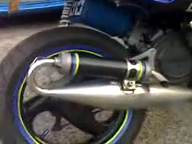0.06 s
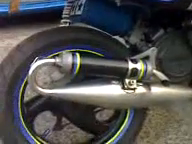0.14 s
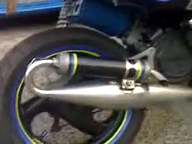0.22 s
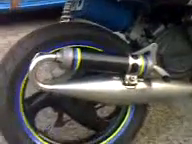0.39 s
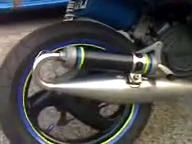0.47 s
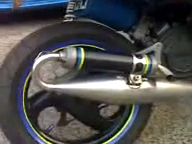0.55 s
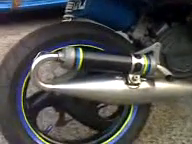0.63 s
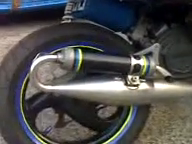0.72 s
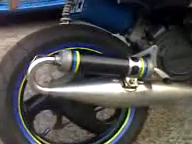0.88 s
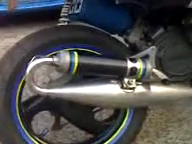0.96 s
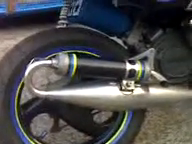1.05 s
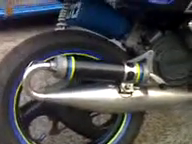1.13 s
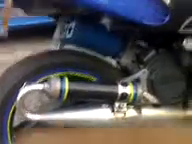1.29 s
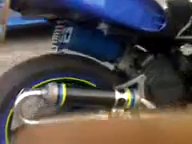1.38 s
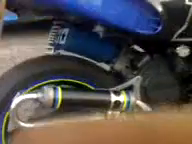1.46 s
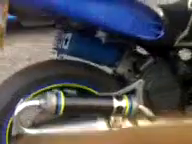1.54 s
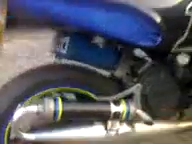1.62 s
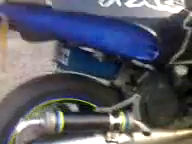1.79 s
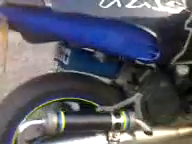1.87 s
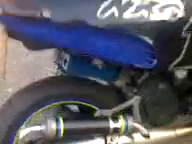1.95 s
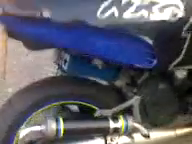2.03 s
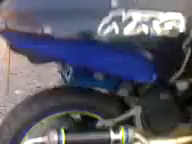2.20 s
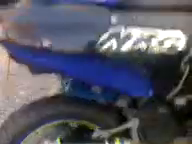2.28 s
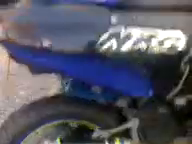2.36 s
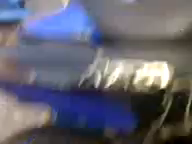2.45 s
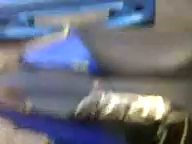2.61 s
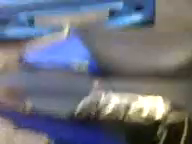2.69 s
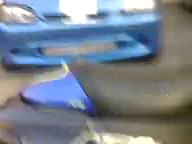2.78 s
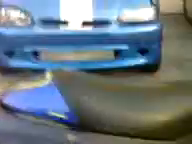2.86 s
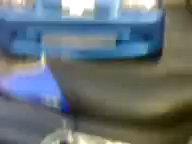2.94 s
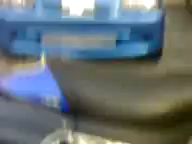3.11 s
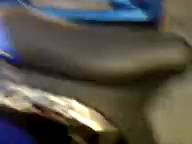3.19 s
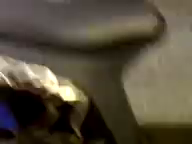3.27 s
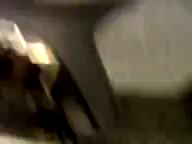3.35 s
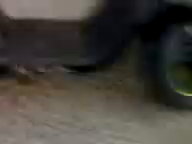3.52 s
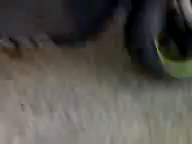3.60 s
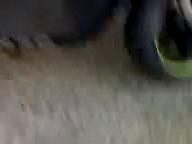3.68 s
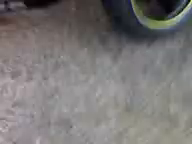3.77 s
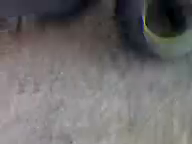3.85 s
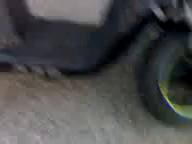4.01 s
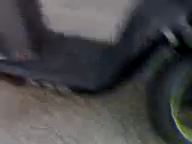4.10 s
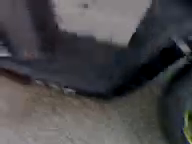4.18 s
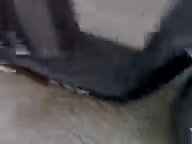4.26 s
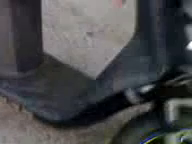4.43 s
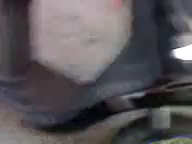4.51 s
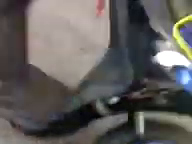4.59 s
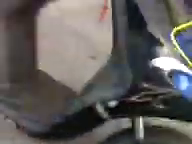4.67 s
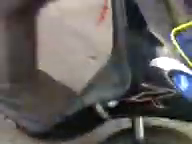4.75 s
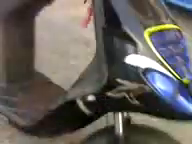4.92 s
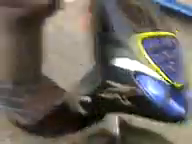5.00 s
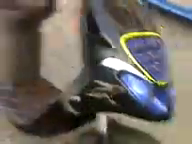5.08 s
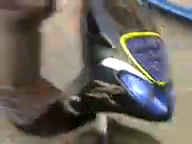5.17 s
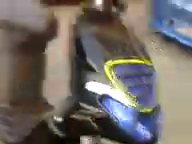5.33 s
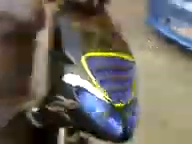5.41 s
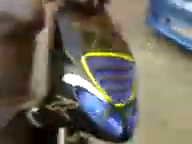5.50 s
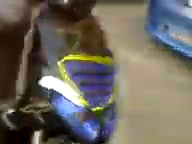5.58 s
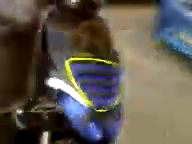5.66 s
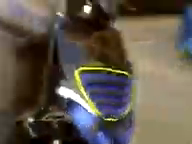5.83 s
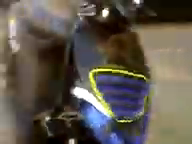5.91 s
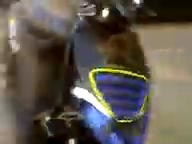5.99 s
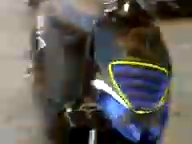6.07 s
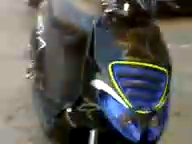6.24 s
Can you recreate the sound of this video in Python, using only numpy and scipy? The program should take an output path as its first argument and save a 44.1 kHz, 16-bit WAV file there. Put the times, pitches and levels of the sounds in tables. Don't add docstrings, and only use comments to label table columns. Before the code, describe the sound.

Close, rough two-stroke idle: irregular hollow pops, fast metallic ticking and rattling covers, growing duller and then quieter as the phone moves forward.

```python
import sys
import numpy as np
from scipy import signal
from scipy.fft import rfft, irfft, next_fast_len
from scipy.io import wavfile
from scipy.ndimage import uniform_filter1d, map_coordinates

SR = 44100
rng = np.random.default_rng(int(sys.argv[2]) if len(sys.argv) > 2 else 0)


def to_linear_factor(level_db):
    exponent = np.asarray(level_db, float) / 20
    return 10 ** exponent


def dump(signal):
    limited = np.clip(np.atleast_2d(signal).T, -1, 1)
    pcm = np.round(limited * 32767).astype(np.int16)
    wavfile.write(sys.argv[1], SR, pcm)


N = 275625
TURN = .0317

# (time [s], favoured pitch [Hz], its width [Hz], treble [dB], firing level [dB])
PLACE = [(0, 773, 118.6, -6.5, -12.5), (1.3, 804, 120.6, -8, -9.5), (2.1, 757, 121, -10, -9),
         (2.5, 803, 122, -13, -8), (2.75, 910, 249, -2, -16), (3, 610, 121, -6, -15),
         (3.3, 600, 181, -15.5, -13), (3.6, 770, 280, -19.5, -6.5), (4, 783, 283, -18.5, -9),
         (4.4, 863, 299, -10, -10.5), (4.8, 937, 200, -26, -12.5), (5.1, 1040, 200, -19, -13.5),
         (5.6, 1050, 228, -10.5, -16.5), (6.25, 980, 220, -4.5, -22.5)]
# (time [s], loss with distance [dB], cover over case [dB])
WALK = [(0, -0.2, 0.2), (1.1, -1.5, 0), (1.35, 0, 1.5), (1.9, -2, 3.5), (2.4, -3.5, 2), (2.8, -4.5, -2),
        (3.1, -2, 2.5), (3.45, -4.5, 7.5), (3.65, -5.5, 8.5), (4, -3.5, 6.5), (4.4, -5.5, 4),
        (5.2, -6.5, 2.5), (5.6, -7.5, 0), (5.85, -9.5, -2), (6.25, -12.5, -4.5)]
# (time [s], usual ping [dB], pitch [Hz])
SHIELD_VIEW = [(0, -12, 1636), (1.3, -11, 1644), (1.5, -20.5, 1653), (1.9, -10, 1660), (2.5, -16, 1605),
               (2.88, -15.5, 1654), (3, -24, 1744), (3.07, -12, 1592), (3.4, -13.5, 1625),
               (3.9, -16.5, 1690), (4.02, -31.5, 1760), (4.11, -14, 1738), (4.25, -27.5, 1605),
               (4.45, -21.5, 1618), (4.8, -22, 1581), (5.83, -32.5, 1602), (5.9, -21.5, 1650),
               (6.25, -16, 1661)]
# (time [s], level [dB])
OUTLET_BASS = [(0, 3.2), (1.4, 0.5), (2.1, -4), (3.6, -8), (4.2, -7), (6.25, -4.5)]


def unit(x):
    return x / np.sqrt(np.mean(x ** 2) + 1e-20)


def along(points, hz):
    f, v = np.transpose(points)
    return np.interp(np.log(hz + 1), np.log(f + 1), v)


def curves(rows, s):
    t, *cols = np.transpose(rows)
    return [np.interp(s, t, c) for c in cols]


def filtered(x, response):
    m = next_fast_len(N + SR // 2)
    return irfft(rfft(x, m) * response(np.fft.rfftfreq(m, 1 / SR)), m)[..., :N]


def resonances(modes):
    def response(f):
        total = 0
        for k, (centre, width, db) in enumerate(modes):
            total = total + (-1) ** k * to_linear_factor(db) * 1j * f * width / (centre ** 2 - f * f + 1j * f * width)
        return total
    return response


def spectrum(points):
    return lambda f: to_linear_factor(along(points, f))


def lowpass(hz):
    return lambda f: 1 / (1 + (f / hz) ** 2)


def placed(starts, shapes):
    at = np.round(starts * SR).astype(int)[:, None] + np.arange(shapes.shape[1])
    return np.bincount(np.clip(at, 0, N).ravel(), shapes.ravel(), N + 1)[:N]


def firings():
    # (time [s], crank turns between firings from here on [turns])
    rhythm = [(.064, 3), (.156, 2), (.554, 3), (.938, 2), (1.003, 3), (1.283, 2), (1.349, 3), (1.922, 2),
              (2.053, 3), (2.15, 3), (2.239, 2), (2.303, 3), (2.682, 2), (2.814, 3), (3.196, 2), (3.393, 3),
              (3.592, 3), (3.964, 2), (4.027, 3), (4.122, 2), (4.19, 3), (4.383, 3), (4.569, 4), (4.693, 3),
              (4.974, 2), (5.04, 3), (5.808, 2), (5.876, 3), (6.163, 3)]
    # (time [s], loss [dB])
    weak = [(.156, 1.5), (.22, 1), (1.283, 4.5), (2.239, 6.5), (2.398, 1), (2.682, 2), (3.493, 2),
            (4.122, 2.5), (4.974, 3.5), (5.808, 2), (5.876, 1.5)]
    s, wait = np.transpose(rhythm)
    spans = np.round(np.diff(s) / TURN / wait[:-1]) * wait[:-1]
    marks = np.r_[3, 3 + np.cumsum(spans)]
    runs = [np.arange(a, b, w) for a, b, w in zip(marks, marks[1:], wait)]
    turn = np.concatenate(runs + [marks[-1:]])
    when = np.interp(turn, marks, s)
    db = curves(PLACE, when)[3] + 0.23 * rng.standard_normal(len(when))
    poor, loss_db = np.transpose(weak)
    db[np.abs(when[:, None] - poor).argmin(axis=0)] -= loss_db
    return when, turn, db


def crank(when, turn):
    times = np.r_[when[0] - 3 * TURN, when, when[-1] + 4 * TURN]
    return np.interp(np.arange(N) / SR, times, np.r_[0, turn, turn[-1] + 4])


def turn_starts(angle):
    return np.flatnonzero(np.diff(np.floor(angle)))


def stroke_sizes(angle):
    return to_linear_factor(1.5 * rng.standard_normal(500))[(2 * angle).astype(int)]


def strokes(angle, floor):
    phase = 2 * angle % 1
    knock = np.exp(-4 * phase) * 1.6 * (1 - np.exp(-9 * phase))
    return stroke_sizes(angle) * (floor + knock)


def shaken(gate, response):
    return unit(filtered(gate * rng.standard_normal(N), response))


def engine_case(angle, loss_db, lean_db):
    # (pitch [Hz], width [Hz], level [dB])
    case_modes = [(215, 28, -4), (281, 32, 0), (320, 36, -3)]
    shaking = unit(strokes(angle, 0.94) * rng.standard_normal(N))
    blows = unit(stroke_sizes(angle) * np.diff(np.floor(angle), prepend=0))
    ringing = filtered(shaking + 0.67 * blows, lambda f: resonances(case_modes)(f) ** 2)
    return to_linear_factor(-31 + 0.64 * loss_db - lean_db) * unit(ringing)


def covers(angle, loss_db, lean_db):
    # (pitch [Hz], width [Hz], level [dB])
    cover_modes = [(405, 25, -7), (520, 24, 0), (580, 50, -9)]
    return to_linear_factor(-34.5 + .45 * loss_db + lean_db) * shaken(strokes(angle, 0.37), resonances(cover_modes))


def whirr(angle, loss_db):
    # (pitch [Hz], level [dB per Hz])
    whirr_colour = [(360, -38.5), (620, 5), (869, -10.5), (950, 0.5), (1230, -7), (1380, -1), (1610, -1),
                    (1850, -7.5), (2000, -25), (2600, -42.5), (4400, -120)]
    return to_linear_factor(-29.5 + loss_db) * shaken(strokes(angle, 0.77), spectrum(whirr_colour))


def fine_rattle(angle, loss_db):
    # (pitch [Hz], level [dB per Hz])
    hiss_colour = [(1120, -27.5), (1900, -1.5), (2170, 2), (2680, -11), (3070, -8), (3990, -28.5),
                   (4240, -37.5), (5510, -67.5), (9330, -120)]
    # (pitch [Hz], width [Hz], level [dB])
    fin_modes = [(3086, 160, -4), (2550, 120, -4.5)]
    flutter_db = 2.5 * map_coordinates(rng.standard_normal(300), [angle], order=1)
    hiss = to_linear_factor(flutter_db - 37.5 + 1.57 * loss_db) * shaken(strokes(angle, 1.0), spectrum(hiss_colour))
    fins = to_linear_factor(flutter_db - 49.5 + .5 * loss_db) * shaken(strokes(angle, 0.58), resonances(fin_modes))
    return hiss + fins


def rumble(angle, now):
    # (pitch [Hz], level [dB per Hz])
    rumble_colour = [(18, -55.5), (30, -12), (97, -14), (150, -7), (180, -1.5), (230, -15.5), (400, -120)]
    level_db = -40 + .8 * curves(OUTLET_BASS, now)[0]
    return to_linear_factor(level_db) * shaken(strokes(angle, 0.23), spectrum(rumble_colour))


def hollow(angle, now):
    # (time [s], resonance [Hz], level [dB])
    hollow_path = [(0, 330, -41), (2.2, 335, -36.5), (2.5, 340, -31.5), (3, 345, -29), (3.3, 350, -33),
                   (3.55, 385, -31), (3.8, 460, -37), (4.3, 430, -40), (6.25, 400, -41)]
    hz, db = curves(hollow_path, now)
    breadth = shaken(strokes(angle, 1.0), lowpass(60))
    return to_linear_factor(db + 4.5) * breadth * np.sin(2 * np.pi * np.cumsum(hz) / SR)


def chatter(angle, now):
    ping_db, hz = curves(SHIELD_VIEW, now)
    tremor = shaken(strokes(angle, 0.083), lowpass(50))
    return to_linear_factor(ping_db - 15) * tremor * np.sin(2 * np.pi * np.cumsum(hz) / SR)


def moving_parts(angle):
    now = np.arange(N) / SR
    loss_db, lean_db = curves(WALK, now)
    body = engine_case(angle, loss_db, lean_db) + covers(angle, loss_db, lean_db)
    light = whirr(angle, loss_db) + fine_rattle(angle, loss_db)
    return body + light + rumble(angle, now) + hollow(angle, now) + chatter(angle, now)


def pipe(starts, peak_db, tilt_db, scatter_db, blur):
    # (pitch [Hz], level [dB], time to die by 60 dB before damping
    # [s])
    pipe_modes = [(209, -4, .07), (300, -5, .07), (400, -7, .07), (520, -3, .07), (650, -2, .06),
                  (725, -2, .065), (785, -5, .06), (840, 0, .07), (940, 0, .07), (1030, -2, .065),
                  (1135, -2, .065), (1250, -9, .05), (1345, -1, .06), (1480, -5, .05), (1700, -4, .05),
                  (1870, -8, .05), (2065, -8, .05), (2180, 1, .065), (2300, -8, .045), (2520, -12, .04),
                  (2800, -14, .04), (3100, -15, .04)]
    # (time [s], lag of upper waves [s per kHz], share heard straight from the mouth [ratio])
    sound_paths = [(0, .016, .7), (3, .016, .6), (3.5, .016, .7), (4.1, .014, .8), (4.5, .014, 1),
                   (4.9, .016, .9), (5.05, .018, .6), (6.25, .018, .6)]
    damping = 1.45
    shielded_hz = 1800
    muffled_hz = 2830
    hz, db, t60 = np.transpose(pipe_modes)
    centre, width, treble_db = (c[:, None] for c in curves(PLACE, starts)[:3])
    lag, prompt = (c[:, None] for c in curves(sound_paths, starts))

    floor = to_linear_factor(np.where(hz > centre, treble_db, -9))
    favour = np.maximum(1 / (1 + ((hz - centre) / width) ** 4), floor)
    scatter = scatter_db * rng.standard_normal(favour.shape)
    gain = favour * to_linear_factor(db + tilt_db * np.log2(hz / 800) + scatter)
    phase = blur * rng.standard_normal(favour.shape)[..., None]

    late = lag * np.clip(hz / 1000 - .62, 0, .65)
    late = np.round(late * hz) / hz
    f = np.arange(480) * SR / 4096
    push = hz[:, None] * np.cos(phase) + 1j * f * np.sin(phase)
    ring = push / (hz[:, None] ** 2 - f * f + 2.2j * damping * f / t60[:, None])
    straight = (prompt / (1 + (hz / shielded_hz) ** 2))[..., None]
    paths = straight + np.exp(-2j * np.pi * f * late[..., None])

    mouth = 1j * f * 700 / (centre ** 2 - f * f + 1j * f * 700)
    mouth = mouth * 1j * f / (70 + 1j * f)
    packing = 1 - (f / muffled_hz) ** 2 + 1.3j * f / muffled_hz
    rung = (gain[..., None] * ring * paths).sum(axis=1)
    blows = irfft(rung / (1 + 1j * f / 1500) / packing * mouth, 4096)
    strength = blows[:, :SR // 60].std(axis=1, keepdims=True) * 2.5
    return placed(starts, to_linear_factor(peak_db)[:, None] * blows / strength)


def puffs(angle, shake_db):
    turns = turn_starts(angle) / SR
    luck_db = 2.8 * rng.standard_normal(len(turns))
    puff_db = curves(WALK, turns)[0] - 21 + 0.45 * shake_db + luck_db
    return pipe(turns, puff_db, tilt_db=-9.0, scatter_db=4.5, blur=0.95)


def rasp(s, db):
    # (pitch [Hz], level [dB per Hz])
    rasp_colour = [(300, -32.5), (600, 2.5), (1300, 4), (2200, 1), (3200, -18.5), (4300, -40.5),
                   (6000, -120)]
    t = np.arange(SR // 20) / SR
    burst = t / 0.0024 * np.exp(1 - t / 0.0052)
    jet = placed(s, to_linear_factor(db + 0.82 * curves(PLACE, s)[2])[:, None] * burst)
    return to_linear_factor(-8.5) * jet * shaken(1, spectrum(rasp_colour))


def thump(s):
    t = np.arange(SR // 10) / SR
    luck = rng.standard_normal((len(s), 2))
    db = -20.5 + curves(OUTLET_BASS, s)[0] + 2.5 * luck[:, 0]
    hz = 190 * (1 + .12 * luck[:, 1:])
    fade = to_linear_factor(db[:, None] - 60 * t / .055)
    return placed(s, fade * (1 - np.exp(-t / 0.0053)) * np.sin(2 * np.pi * hz * t))


def exhaust(angle, s, db, shake_db):
    cracks = pipe(s - .0003, db + .5, tilt_db=0, scatter_db=2.5, blur=.3)
    return cracks + rasp(s, db) + thump(s) + puffs(angle, shake_db)


def contacts(angle, fired):
    after_firing_db = [
        1.5,
        -4,
        -2,
        -4,
    ]
    # (time [s], peak [dB])
    clang = [(0.0628, -8.5), (.162, -5.5), (0.195, -1.5), (0.2601, -3.5), (0.2908, -8), (0.4234, -6),
             (0.5624, -6.5), (0.6278, -13), (0.6619, -6), (0.7836, -11), (0.8804, -3), (0.915, -2.5),
             (1.012, -8), (1.3456, -8), (1.513, -9), (1.7412, -5), (2.0602, -7), (2.2493, -5.5),
             (2.4693, -4.5), (2.823, -11.5), (3.27, -7), (3.3327, -9.5), (3.6012, -11), (3.6915, -9.5),
             (3.8743, -9), (4.567, -16), (4.6696, -13.5), (5.211, -11.5), (6.0792, -13), (6.1734, -14.5)]
    at = turn_starts(angle)
    turn = np.round(angle[at])
    last_fired = fired[np.maximum(np.searchsorted(fired, turn, "right") - 1, 0)]
    since = (turn - last_fired).astype(int) % len(after_firing_db)
    luck = rng.standard_normal((len(at), 2))
    s = at / SR + .0065 + 0.00072 * luck[:, 0]
    db = curves(SHIELD_VIEW, s)[0] + np.array(after_firing_db)[since] + 3 * luck[:, 1]
    hard, hard_db = np.transpose(clang)
    nearest = np.abs(s[:, None] - hard).argmin(axis=0)
    s[nearest], db[nearest] = hard, hard_db
    return s, db


def shield(s, db):
    t = np.arange(SR // 16) / SR
    luck = rng.standard_normal((len(s), 3))
    hz = curves(SHIELD_VIEW, s)[1] * (1 + .01 * luck[:, 0])
    split = 46 * (1 + .1 * luck[:, 1])
    envelope = to_linear_factor(-60 * t / .035) * (1 - np.exp(-(t / .004) ** 2))
    beat = np.sin(2 * np.pi * split[:, None] * t) * envelope
    ring = beat * np.sin(2 * np.pi * hz[:, None] * t + 3 * luck[:, 2:])
    rough = unit(uniform_filter1d(rng.standard_normal(beat.shape), size=70))
    upper = np.sin(3.9 * np.pi * hz[:, None] * t + 2 * luck[:, 1:2])
    ring += to_linear_factor(-26) * beat * rough * upper
    return placed(s - .0025, to_linear_factor(db + 8.5)[:, None] * ring)


def yard(x):
    # (pitch [Hz], time to die by 60 dB [s])
    echo_times = [(200, 0.96), (1000, 0.25), (4000, 0.013)]
    hz, t, z = signal.stft(rng.standard_normal(SR // 3), SR, nperseg=256)
    fade = to_linear_factor(-60 * t / along(echo_times, hz)[:, None])
    tail = signal.istft(z * fade, SR, nperseg=256)[1]
    return signal.fftconvolve(np.pad(x, (300, 0)), tail / np.linalg.norm(tail))[:N]


def scene():
    when, turn, db = firings()
    angle = crank(when, turn)
    knocks, knock_db = contacts(angle, turn)
    shake_db = knock_db - curves(SHIELD_VIEW, knocks)[0]
    hits = exhaust(angle, when, db, shake_db) + shield(knocks, knock_db)
    return (hits + to_linear_factor(-21.0) * yard(hits) + moving_parts(angle))[None]


def overload_ticks():
    # (time [s], peak [dB])
    overload = [
        (0.0732, -31),
        (0.6624, -50),
        (0.7567, -27),
        (1.0989, -42),
        (1.1952, -31),
        (2.0612, -31),
    ]
    s, db = np.transpose(overload)
    ticks = placed(s, to_linear_factor(db + 11)[:, None] * signal.windows.gaussian(15, 1.35)[None])
    return filtered(ticks, lambda f: 1 / (1 + (3900 / (f + 1)) ** 10))


def phone_band(f):
    bass = ((1j * f / 40) / (1 + 1j * f / 40)) ** 2
    return bass / (1 + (f / 4050) ** 18) * (f < 4400)


def low_pass(x):
    return signal.sosfilt(signal.butter(12, 15850, fs=SR, output="sos"), x)


def record(dry):
    ceiling = .68
    held = dry / (1 + np.abs(dry / ceiling) ** 8) ** (1 / 8)
    fade_out = np.clip((N - np.arange(N)) / 130, 0, 1)
    mix = filtered(held, phone_band) * fade_out + overload_ticks()
    return low_pass(mix)


dry = scene()
out = record(dry)
dump(out)
```